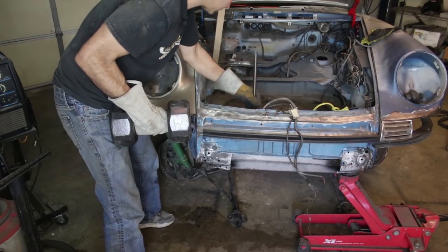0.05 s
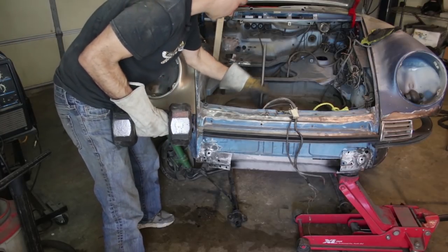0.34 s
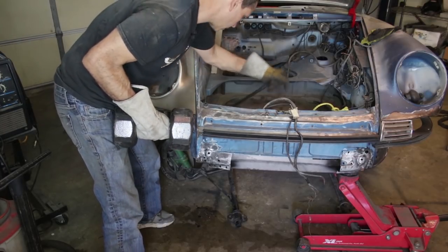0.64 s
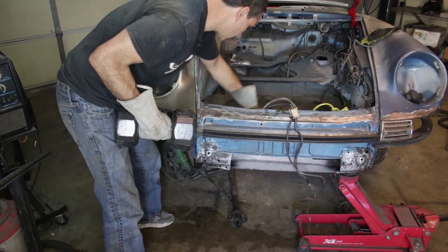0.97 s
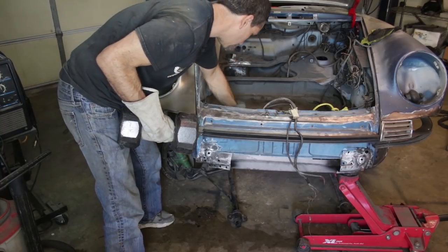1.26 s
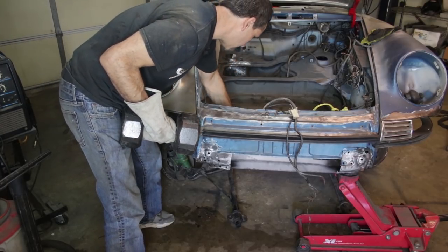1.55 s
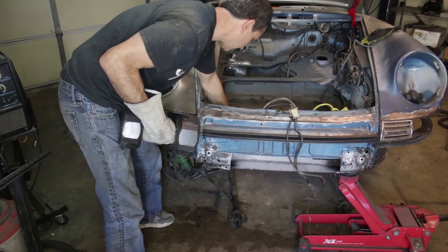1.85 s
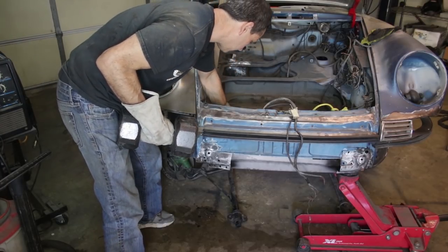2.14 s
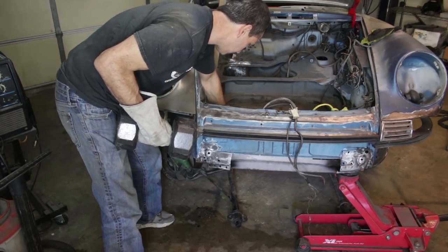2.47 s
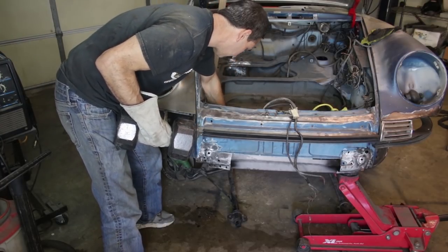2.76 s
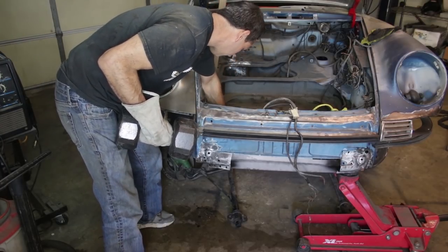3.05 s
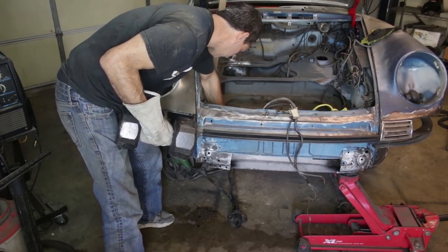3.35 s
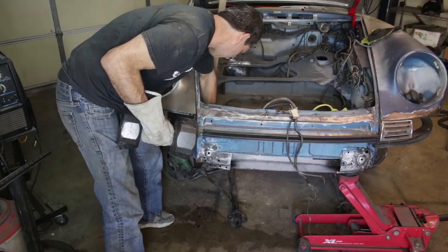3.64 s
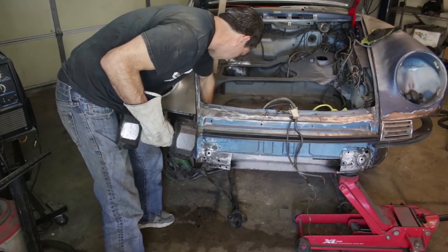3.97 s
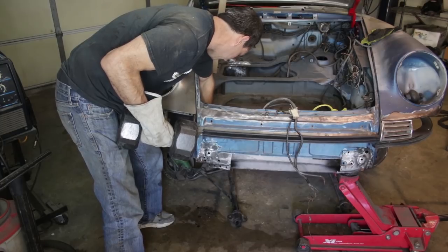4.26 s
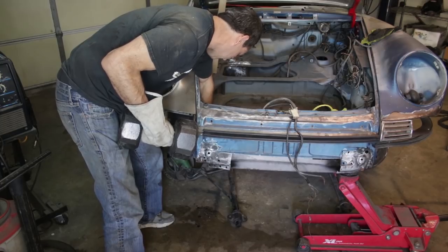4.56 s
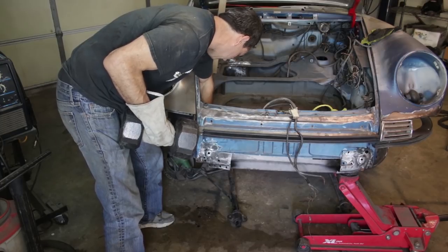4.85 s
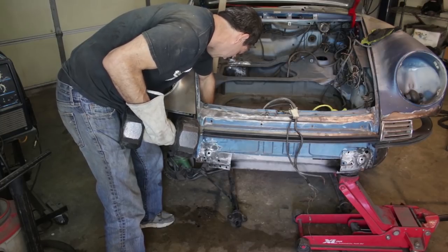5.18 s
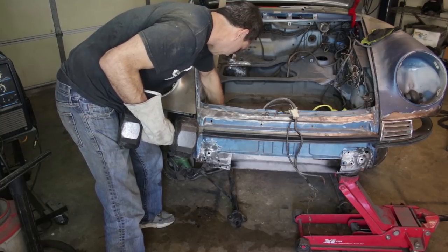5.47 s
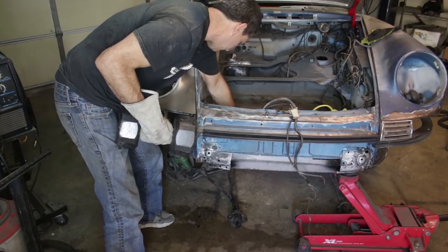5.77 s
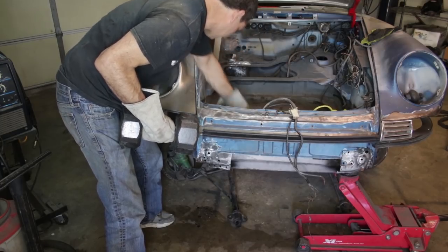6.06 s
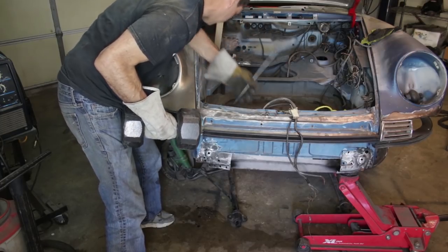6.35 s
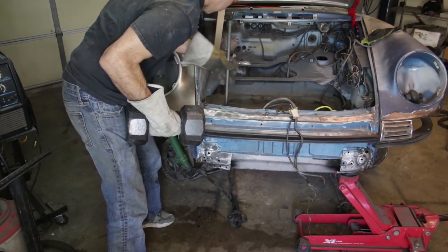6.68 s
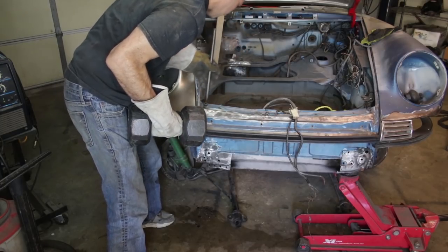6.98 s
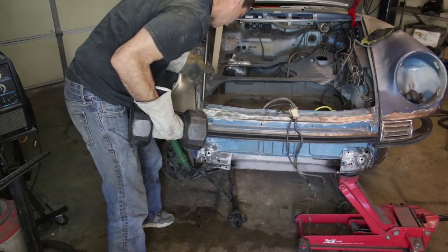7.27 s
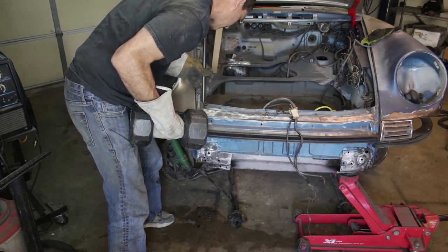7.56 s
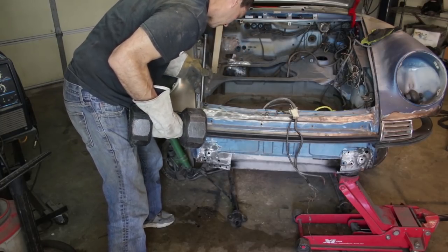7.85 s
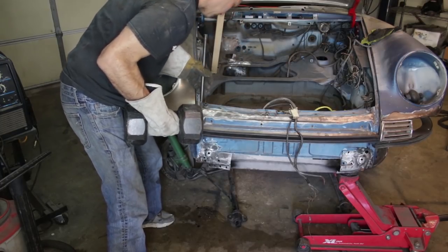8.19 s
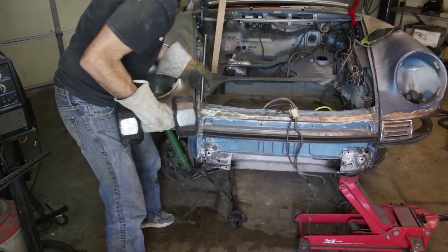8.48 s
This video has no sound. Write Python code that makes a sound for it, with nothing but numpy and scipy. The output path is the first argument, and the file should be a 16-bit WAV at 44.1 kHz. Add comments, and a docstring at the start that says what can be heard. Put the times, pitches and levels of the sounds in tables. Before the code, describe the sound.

Ringing hammer blows on a hollow car shell, with a steel bar clanging and scraping against the panels in between, in an echoing garage.

```python
"""A heavy hammer blow booms through a bare car body shell in a garage. A steel bar is then shifted
in the engine bay: it knocks, judders and scrapes on the sheet metal and once clinks free, among light
taps and the slide of glove and sleeve. Four more blows land near the end.
Each hit is a burst of crowded panel modes, a few clear ringing ones and the garage's echo;
each scrape is a stream of tiny slips. Faint air and hum lie underneath."""
import sys
import numpy as np
from scipy import signal
from scipy.fft import rfft, irfft, next_fast_len
from scipy.io import wavfile

SR = 44100
rng = np.random.default_rng(int(sys.argv[2]) if len(sys.argv) > 2 else 0)


def master(y):
    """Save y as 16-bit WAV."""
    cut = np.clip(np.atleast_2d(y).T, -1, 1)
    pcm = np.round(cut * 32767)  # scale
    wavfile.write(sys.argv[1], SR, pcm.astype(np.int16))


N = 380140
RING = np.arange(SR) / SR  # time since a contact, s

# decay of the garage's echo: f/Hz, t60/s
GARAGE_DECAY = [(100, 1), (300, 0.62), (700, 0.36), (1500, 0.4), (4000, 0.38), (12000, 0.37)]
# clear modes of the steel bar and of the hammer head: f/Hz, level/dB, t60/s
STEEL_BAR_MODES = [(926, -20, .29), (1125, -11, .25), (1330, -7, .17), (1486, 2, .32), (2090, -8, .27),
                   (2550, -27, .18), (3130, -20, .27), (3270, -24, .25), (5300, -24, .15)]
HAMMER_HEAD_MODES = [(1004, 3.5, 0.25), (1249, 4, 0.14), (1540, -1.5, 0.14), (1880, -9, 0.27),
                     (2140, -11, 0.13), (2478, -1.5, 0.14), (4470, -14, 0.17), (5280, -20, 0.14),
                     (6676, -23, 0.11), (9200, -22.5, 0.12)]
# tone of the sheet metal under a light touch: f/Hz, level/dB
LIGHT_TOUCH_TONE = [(59, -43.5), (100, -3.5), (588, -3), (742, -0.5), (1730, -9), (2630, -20.5),
                    (2930, -15), (9950, -22.5), (15500, -29)]


def amp(db):
    """Decibels to gain."""
    return 10 ** (np.asarray(db) / 20)


def curve_at(points, hz):
    """Reads a curve on a log-frequency axis."""
    f, value = np.transpose(points)
    return np.interp(np.log(hz + 1), np.log(f + 1), value)


def add(mix, start_s, sound):
    """Mixes a sound in at start_s."""
    part = mix[max(round(start_s * SR), 0):][:len(sound)]
    part += sound[:len(part)]


def filtered(x, gain):
    """Shapes the spectrum of x and scales it to rms 1."""
    shaped = irfft(rfft(x) * gain, len(x))
    return shaped / np.sqrt(np.mean(shaped ** 2) + 1e-20)


def dying(x, decay, stretch=1):
    """Lets each frequency of x die away at its own speed."""
    hz, t, spectrum = signal.stft(x, SR, nperseg=256)
    t60 = np.maximum(stretch * curve_at(decay, hz), .01)
    fade = np.exp(-np.log(1000) * t / t60[:, None])
    return signal.istft(spectrum * fade, SR, nperseg=256)[1][:len(x)]


def through_shell(tone, hz):
    """Gain at each frequency for a contact's tone, coloured by the car's shell and a few hollows."""
    # resonances of the shell, and hollows heard under every contact: f/Hz, width/Hz, level/dB
    resonances = [(101, 17, 6), (128, 23, 5), (183, 36, -5.5), (204.3, 25, 4), (328, 36, 6.5), (459, 14, 6),
                  (500, 50, 6.5), (555, 30, -5), (632, 87, 4), (745, 43, 4), (827, 29, 2.5), (1080, 12, 2),
                  (1150, 30, 1), (1224, 27, 4.5), (1398, 22, 9.5), (1724, 50, 3), (2255, 24, 0),
                  (3090, 48, 4.5), (3830, 76, 4), (4340, 65, 4.5), (5416, 47, 5), (9300, 78, 5)]
    centre, width, db = np.transpose(resonances)[:, :, None]
    shell_db = (db / (1 + (2 * (hz - centre) / width) ** 2)).sum(0)
    return amp(curve_at(tone, hz) + shell_db)


def ringing(modes, hardness, pitch=1, uneven_db=2):
    """Decaying sines; each contact gives every mode a random phase and share."""
    hz, db, t60 = np.transpose(modes)[:, :, None]
    phase, share = rng.random((2, len(modes), 1))
    height = amp(db + curve_at(hardness, hz) + uneven_db * (share - .5))
    fade = np.exp(-np.log(1000) * RING / t60)
    return (height * fade * np.sin(2 * np.pi * (pitch * hz * RING + phase))).sum(0)


def strikes(hits, tone, modes, level_db, modes_db, room_db, crack, swell_s, ring):
    """Each hit spreads through the shell's crowded modes, rings a few clear ones and fills the garage."""
    # decay of the sheet metal, before scaling by ring: f/Hz, t60/s
    sheet_decay = [(100, 0.45), (400, 0.29), (1200, 0.25), (4000, 0.17), (12000, 0.18)]
    crack_s, room_rise_s, swell_doubles_db = .0031, .013, 28.5
    cracking = 1 + crack * np.exp(-RING / crack_s)  # the struck spot sounds first
    room_rise = 1 - np.exp(-RING / room_rise_s)
    hardest_db = max(hit[1] for hit in hits)
    hz = np.fft.rfftfreq(SR, 1 / SR)
    gain = through_shell(tone, hz)
    body = rng.standard_normal((2, SR))
    out = np.zeros(N)
    for start, db, bass, clang, treble, *pitch in hits:
        # one body answers every hit, but each spot excites it a little differently
        near, far = np.sqrt(.5) * (body + rng.standard_normal((2, SR)))
        # soft contacts push the bass, hard ones the clang and the treble
        hardness = [(200, bass), (550, 0), (1800, clang), (5500, treble)]
        spot = gain * amp(curve_at(hardness, hz))
        sheet = dying(filtered(near, spot), sheet_decay, ring) * cracking
        echo = amp(room_db) * dying(filtered(far, spot), GARAGE_DECAY) * room_rise
        clear = amp(modes_db) * ringing(modes, hardness, *pitch)
        # a harder hit sets more of the shell moving, so it swells more slowly
        rise_s = swell_s * 2 ** ((db - hardest_db) / swell_doubles_db)
        attack = 1 - np.exp(-RING / rise_s)
        add(out, start, amp(db + level_db) * (sheet + echo + clear) * attack)
    return out


def pressure(strokes, attack_s, release_s):
    """Each stroke takes hold, presses steadily harder or softer, and lets go."""
    out = np.zeros(N)
    for start, length, db, swell_db in strokes:
        t = np.arange(0, length, 1 / SR)
        grip = np.minimum(t / attack_s, 1) * np.minimum((length - t) / release_s, 1)
        add(out, start, grip * amp(db + swell_db * (t / length - .5)))
    return out


def friction(force, tone, slips_per_s, spread_db, room_db):
    """Tiny slips of uneven size tick the metal under a stroke; the garage smears them."""
    size = next_fast_len(N)
    slips = (rng.random(size) < slips_per_s / SR) * rng.choice([-1, 1], size)
    heights = amp(spread_db * np.minimum(rng.exponential(1, size), 4))  # most are small, a few catch
    gain = through_shell(tone, np.fft.rfftfreq(size, 1 / SR))
    direct = force * filtered(slips * heights, gain)[:N]
    tail = dying(rng.standard_normal(SR), GARAGE_DECAY)
    echo = signal.fftconvolve(direct, tail / np.linalg.norm(tail))[:N]
    return direct + amp(room_db) * echo


def garage_air(air_db=-66.5, hum_hz=82, hum_db=-79):
    """Room tone: still air with a faint hum."""
    # tone of the air: f/Hz, level/dB
    air_tone = [(12, -35.5), (22, -4.5), (50, -4), (80, -2), (165, -11.5), (240, -6), (450, -12),
                (850, -13), (1500, -21.5), (2500, -30.5), (4300, -32.5), (9500, -36), (12000, -42),
                (15500, -57)]
    size = next_fast_len(N)
    gain = amp(curve_at(air_tone, np.fft.rfftfreq(size, 1 / SR)))
    air = filtered(rng.standard_normal(size), gain)[:N]
    hum = np.sqrt(2) * np.sin(2 * np.pi * hum_hz * np.arange(N) / SR)
    return amp(air_db) * air + amp(hum_db) * hum


def hammer_blows():
    """The heavy hammer sets the body panels booming."""
    # blows: t/s, level/dB, bass/dB, clang/dB, treble/dB, pitch factor of the struck panel
    blows = [(0.0, -17, 7.5, 10.5, 4.5, 0.98), (7.098, -16, 0.5, 0.5, -4.5, 1.055),
             (7.617, -19, 2, 2.5, -1, 1.03), (7.811, -27.5, -4.5, -1.5, -5.5, 1.03),
             (7.892, -23, 1, 3, -2.5, 0.99)]
    # boom of the crowded panel modes: f/Hz, level/dB
    boom_tone = [(30, -53.5), (60, -25.5), (125, -12.5), (180, -8.5), (230, -7.5), (340, -4), (600, -9),
                 (1100, -11), (1900, -18.5), (3000, -26.5), (5000, -32.5), (7000, -39.5), (10000, -43.5),
                 (15500, -62)]
    # panel modes that ring clear: f/Hz, level/dB, t60/s
    panel_modes = [(131, -29, 1), (226.4, -2, 0.51), (238.7, -13, 0.95), (316.4, -18.5, 1),
                   (433.5, 2, 0.26), (516, -8, 0.67), (558, -2, 0.35), (590.4, -1, 0.35), (948, -7.5, 0.3),
                   (1076, -17, 0.25), (1190, -56, .4), (1494, -37, 0.23), (1744, -25, 0.17)]
    return strikes(blows, boom_tone, panel_modes, level_db=-4.5, modes_db=-10.5, room_db=-9,
                   crack=.56, swell_s=.005, ring=.72)


def light_taps():
    """Glove and tool tap the metal, barely waking the bar's ring."""
    # taps: t/s, level/dB, bass/dB, clang/dB, treble/dB
    touches = [(0.277, -63, 14, 8, 9.5), (0.476, -57.5, 12, 4, -5), (0.537, -55.5, 16.5, 1, 5),
               (1.979, -59, -3.5, -1.5, -1), (2.212, -56, 9.5, 2, 7.5), (2.459, -57.5, 0.5, -9, -16),
               (3.218, -56, -13.5, 20, 12), (4.445, -59, -6.5, -8.5, -1), (5.708, -46.5, -3, 4.5, 4.5),
               (5.789, -44.5, -5, -8, -5), (6.619, -47.5, -3, -6, -19.5)]
    return strikes(touches, LIGHT_TOUCH_TONE, STEEL_BAR_MODES, level_db=-3, modes_db=-16.5, room_db=-8.5,
                   crack=1, swell_s=.0014, ring=.94)


def sleeve_slides():
    """Glove and sleeve brush along the metal, their dense slips blurring into a hiss."""
    # strokes: t/s, length/s, level/dB, swell/dB
    strokes = [(.5, 0.37, -77.5, 16), (2.78, 0.2, -71.5, 14), (2.98, 0.052, -53.5, 6),
               (3.07, 0.12, -60.5, -2), (5.705, .28, -63, -3), (6.09, 0.1, -61.5, 3),
               (6.41, .08, -71.5, -1.5), (6.6, 0.11, -66.5, 1.5), (6.87, 0.24, -69, 0.5)]
    # hiss of the cloth: f/Hz, level/dB
    cloth_tone = [(800, -8), (2000, 5), (5500, 2), (7500, -1.5), (10000, -1), (12500, -7), (15500, -20)]
    force = pressure(strokes, attack_s=.0097, release_s=.018)
    return amp(-4.5) * friction(force, cloth_tone, slips_per_s=2100, spread_db=2, room_db=-1.5)


def tool_ticks():
    """A tool ticks drily as it is set down."""
    # ticks: t/s, level/dB, bass/dB, clang/dB, treble/dB
    touches = [(0.945, -57, -7.5, 8, 6), (0.956, -56, 0, 13, 12)]
    return strikes(touches, LIGHT_TOUCH_TONE, HAMMER_HEAD_MODES, level_db=-3, modes_db=-30, room_db=-15.5,
                   crack=.82, swell_s=.0004, ring=.15)


def bar_knocks():
    """The steel bar knocks on the shell and the engine bay clangs."""
    # knocks: t/s, level/dB, bass/dB, clang/dB, treble/dB
    hits = [(1.330, -12.5, 6.5, -2, -4.5), (1.378, -12.5, -1.5, -0.5, -3.5), (1.431, -38, 6, -15, -4),
            (1.519, -27, -7, -10.5, -18), (1.557, -32.5, 9, -6, -6), (1.615, -19, 10.5, -8, -7),
            (1.640, -1, -4.5, -0.5, 3), (1.685, -11.5, 6, 10.5, 16), (1.721, -13.5, 5, 8, 5.5),
            (3.005, -28.5, 7.5, 6.5, 1), (3.8385, -7, -7.5, 14.5, 15), (3.904, -17, 3, 9, 4),
            (3.943, 0.5, -0.5, 6.5, 17.5), (3.994, -8, -23, 9, 3), (4.028, -16.5, 15, 17, 18.5),
            (4.093, -23, -6, 12.5, 1), (4.173, -27, -1.5, -5, -3), (4.231, -18, -6.5, 3, -3),
            (4.579, -18.5, -25.5, -4.5, -2), (4.615, -22, -12.5, 8.5, 7), (4.941, -40, 0, -5.5, -1),
            (5.014, -38, 0, -4, -11.5), (5.875, -18, 8.5, 6.5, 4.5), (5.967, -21, -2, -31, -14),
            (6.163, -15.5, -4, -11, -3), (6.191, -21.5, 4, 3, 1), (8.586, -44, 4, -10, -10)]
    # clang of the crowded panel modes: f/Hz, level/dB
    knock_tone = [(30, -64), (60, -40.5), (110, -17.5), (175, -14), (230, -6), (330, -3), (450, 2.5),
                  (650, -1), (850, 0), (1300, -9.5), (2000, -19), (2900, -25.5), (5000, -31), (7200, -44.5),
                  (10000, -43.5), (15500, -68)]
    # engine bay modes that ring clear: f/Hz, level/dB, t60/s
    bay_modes = [(206, -12.5, 0.93), (268.5, -9.5, 0.27), (349, -9.5, 0.16), (457.4, -8, 0.51),
                 (478, -4.5, 0.23), (512.5, -8, 0.54), (660, -9.5, .35), (753, -4, 0.16), (814, -5.5, 0.19),
                 (996, -16.5, .3), (1118, -4, 0.19), (1400, -7, 0.052), (1760, -21.5, .17),
                 (2248, -15.5, 0.22)]
    return strikes(hits, knock_tone, bay_modes, level_db=-10, modes_db=-15, room_db=-11,
                   crack=.45, swell_s=.004, ring=.82)


def bar_judder():
    """The bar judders to rest on the floor pan in coarse slips."""
    # stroke: t/s, length/s, level/dB, swell/dB
    strokes = [(1.38, 0.17, -36.5, -4)]
    # tone of the floor pan: f/Hz, level/dB
    pan_tone = [(80, -33), (104, -14.5), (160, -30.5), (210, -16.5), (330, -6.5), (440, 3), (530, -11),
                (625, 4), (720, -7.5), (1000, -21.5), (2500, -38.5), (12000, -67.5)]
    force = pressure(strokes, attack_s=.03, release_s=.018)
    return amp(-2) * friction(force, pan_tone, slips_per_s=300, spread_db=2, room_db=-4.5)


def bar_drags():
    """The bar catches and slips over the sheet metal in short, dark scrapes."""
    # strokes: t/s, length/s, level/dB, swell/dB
    strokes = [(2.11, 0.26, -61, -4), (2.966, 0.18, -43.5, -0.5), (3.115, .08, -39.5, 0),
               (4.35, 0.086, -40.5, 0), (4.558, 0.12, -34, -4.5), (4.945, 0.14, -49, 3.5),
               (5.82, 0.097, -41, 3.5), (5.88, 0.14, -40, 3), (6.04, 0.14, -44.5, 25),
               (6.175, 0.13, -35.5, -9), (6.92, 0.094, -52.5, -5)]
    # tone of the scrape: f/Hz, level/dB
    scrape_tone = [(35, -46), (90, -21), (165, -19), (230, -3), (430, -6.5), (750, -1.5), (1100, -11),
                   (2000, -19), (3000, -34), (5500, -38), (10000, -45.5), (15500, -59.5)]
    force = pressure(strokes, attack_s=.028, release_s=.03)
    return amp(-4.5) * friction(force, scrape_tone, slips_per_s=700, spread_db=1.5, room_db=-4)


def bar_clinks():
    """The bar swings free and clinks, its own modes to the fore."""
    # clinks: t/s, level/dB, bass/dB, clang/dB, treble/dB
    hits = [(3.292, -24, -2.5, 3, -2.5), (3.314, -39, 1.5, 1.5, 2.5)]
    # tone of the panel under the clink: f/Hz, level/dB
    clink_tone = [(80, -21.5), (300, -4), (700, -1.5), (1400, -3), (1800, -10), (2700, -13.5), (3500, -15),
                  (5500, -25), (7500, -30), (11000, -38), (15000, -52.5)]
    return strikes(hits, clink_tone, STEEL_BAR_MODES, level_db=-8.5, modes_db=1.5, room_db=-7,
                   crack=.24, swell_s=.00074, ring=.98)


def hammer_pings():
    """Square hits set the steel of the hammer head ringing."""
    # square hits: t/s, level/dB, bass/dB, clang/dB, treble/dB
    hits = [(3.945, -30.5, -3, -4, 13.5), (7.618, -22, 0, 3.5, 3), (7.811, -51, -2, -7, 1),
            (7.892, -41, 4.5, -6.5, 2)]
    # bright tone of steel on steel: f/Hz, level/dB
    ping_tone = [(300, -26), (950, 10), (1500, 2.5), (2450, 5.5), (3000, -15.5), (4200, -13), (5200, -6.5),
                 (6000, -22.5), (8500, -41), (9450, -20.5), (10600, -34), (15000, -59.5)]
    return strikes(hits, ping_tone, HAMMER_HEAD_MODES, level_db=-4, modes_db=-9, room_db=-11.5,
                   crack=.21, swell_s=.0037, ring=.93)


def scene():
    """Hits and scrapes over the room tone, heard in mono from one place in the garage."""
    hits = hammer_blows() + hammer_pings() + bar_knocks() + bar_clinks() + light_taps() + tool_ticks()
    scrapes = bar_judder() + bar_drags() + sleeve_slides()
    return (hits + scrapes + garage_air())[None]


def record(dry, cutoff_hz=15650):
    """A steep low-pass trims the very top of the treble."""
    taps = signal.firwin(511, cutoff_hz, window=("kaiser", 9), fs=SR)
    return signal.oaconvolve(dry, taps[None], "same")


dry = scene()
out = record(dry)
master(out)
```